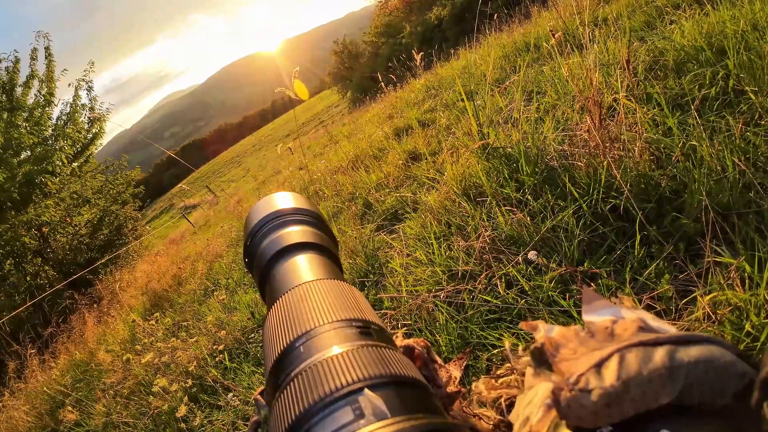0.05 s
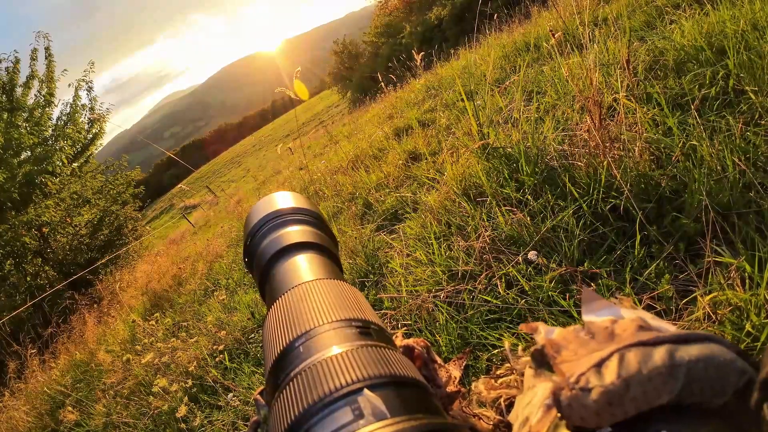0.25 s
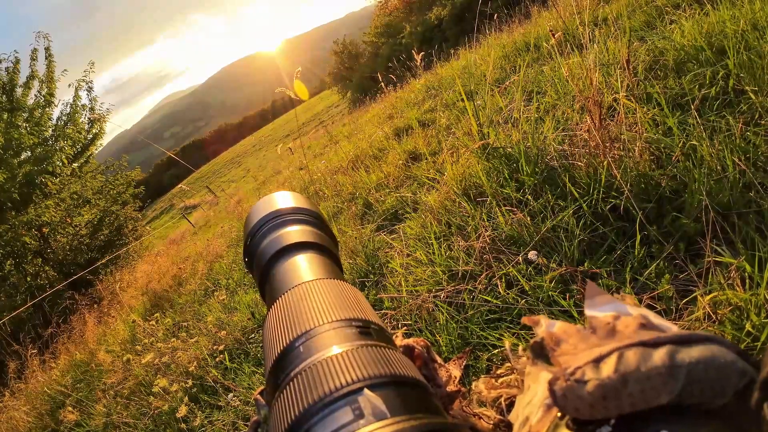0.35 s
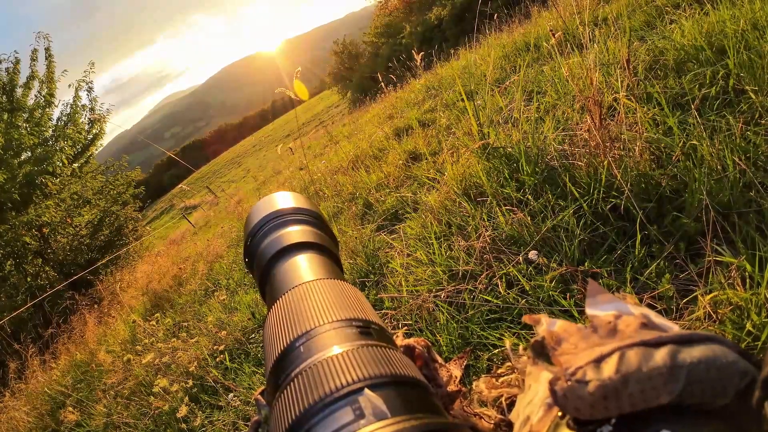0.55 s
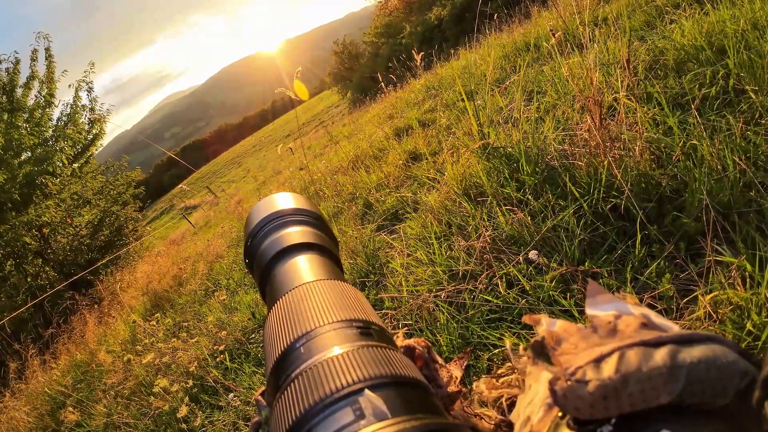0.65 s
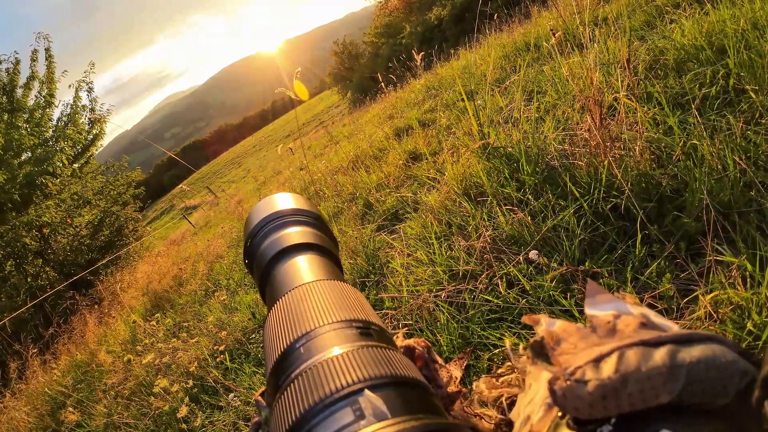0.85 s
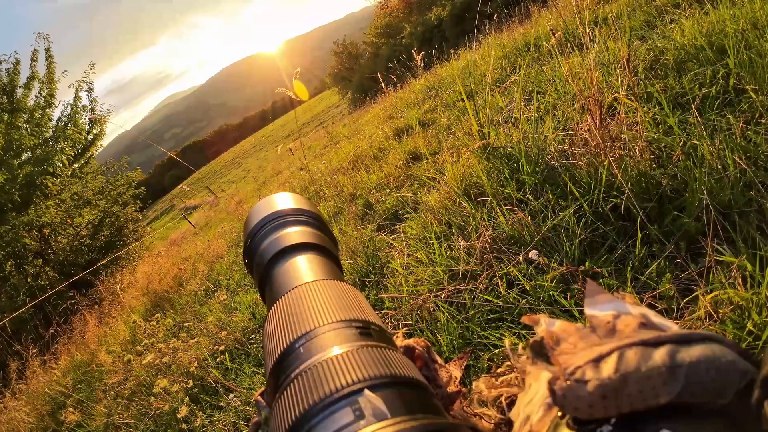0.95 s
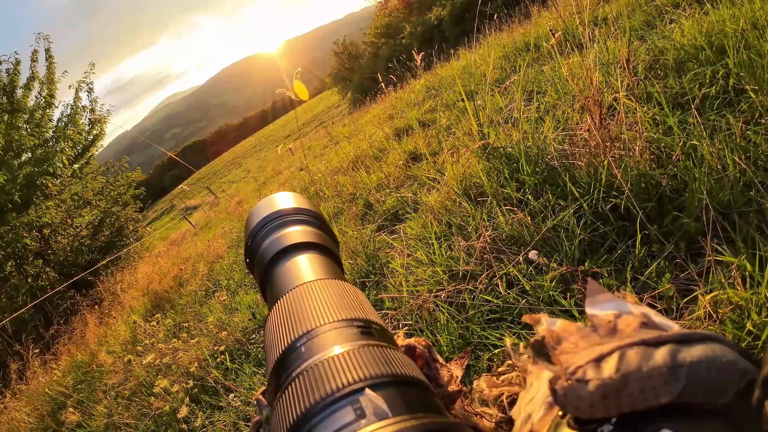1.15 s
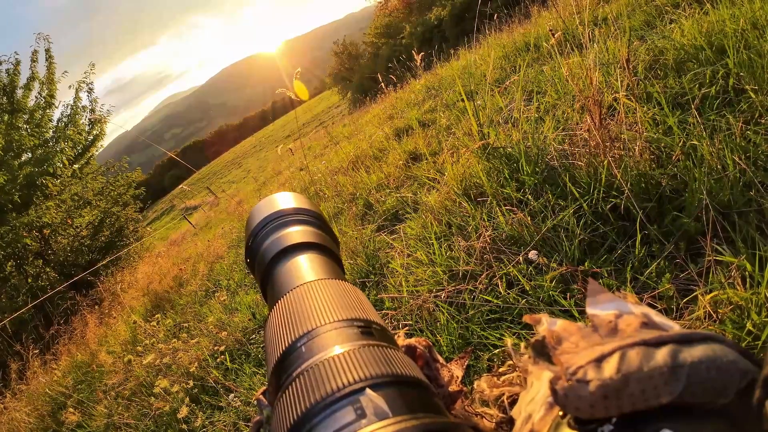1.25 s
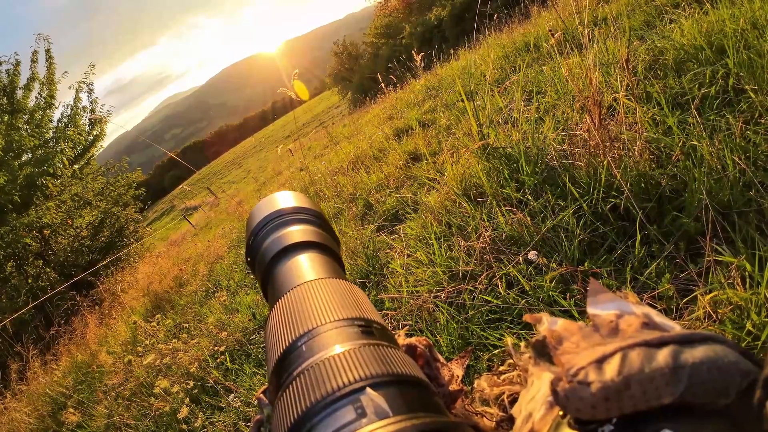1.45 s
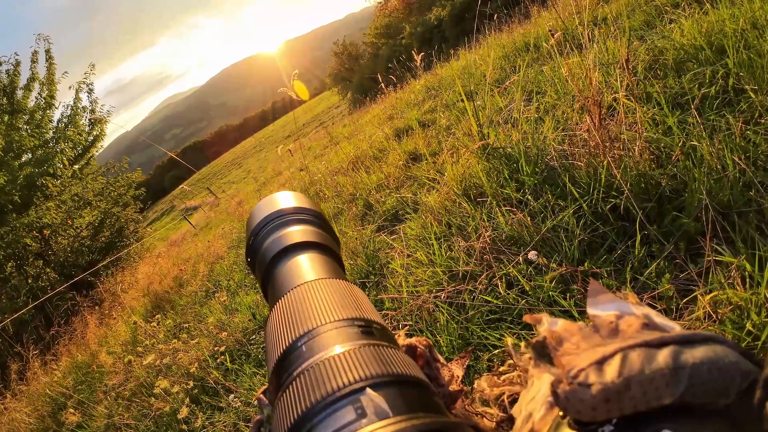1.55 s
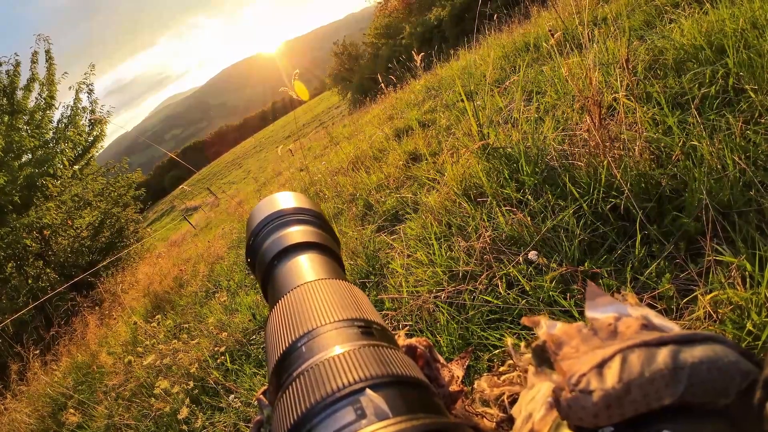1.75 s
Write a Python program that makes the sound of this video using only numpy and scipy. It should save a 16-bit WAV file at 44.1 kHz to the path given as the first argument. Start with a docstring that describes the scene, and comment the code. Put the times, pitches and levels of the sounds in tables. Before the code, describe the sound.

A camera shutter fires once up close, clacking and whirring, over light wind in a quiet meadow

```python
"""In a quiet meadow a reflex camera fires one frame, close to a stereo recorder fixed near it.
Mirror and curtains slap, a motor re-cocks the mechanism with a rattle of latches, and a small actuator in
the lens ticks now and then: every contact is a burst of short decaying sine waves, answered by scattered noise.
Jolts travel through the mount as low decaying tones, and a hand bumps it at the end.
Light wind rumbles on both ports and a hush swells and fades over a faint hiss, all made of shaped noise."""
import sys
import numpy as np
from scipy import signal
from scipy.fft import rfft, irfft, next_fast_len
from scipy.io import wavfile
from scipy.ndimage import map_coordinates

SR = 44100
rng = np.random.default_rng(int(sys.argv[2]) if len(sys.argv) > 2 else 0)


def natural_amplitude(level_db):
    """Convert a level in decibels to a linear amplitude factor, elementwise."""
    exponent = np.asarray(level_db, float) / 20
    return 10 ** exponent


def put_to_file(sound):
    """Save the sound as 16-bit audio at rate SR, in the file named by the first command-line argument."""
    columns = np.atleast_2d(sound).T  # one column per channel
    safe = np.clip(columns, -1, 1)
    whole_steps = np.round(safe * 32767)
    wavfile.write(sys.argv[1], SR, whole_steps.astype(np.int16))


N = 79380


def unit(x):
    """Scaled to rms 1."""
    return x / np.sqrt(np.mean(x ** 2) + 1e-20)


def along(points, hz):
    """Reads a table of (pitch_hz, value) on a log pitch axis."""
    f, v = np.transpose(points)
    return np.interp(np.log(hz + 1), np.log(f + 1), v)


def curve(rows):
    """Turns (time_s, value) rows into one value per sample."""
    return np.interp(np.arange(N) / SR, *np.transpose(rows))


def wobble(rate):
    """A smooth random curve with this many knots a second."""
    knots = rng.standard_normal(int(N * rate / SR) + 4)
    return map_coordinates(knots, [np.arange(N) * rate / SR])


def rush(spectrum, alike):
    """Stereo noise of rms 1: shared (mid) and opposed (side) noise set how alike left and right are."""
    m = next_fast_len(N + 8192)
    hz = np.fft.rfftfreq(m, 1 / SR)
    turn = np.arccos(np.clip(along(alike, hz), -1, 1)) / 2
    shape = natural_amplitude(along(spectrum, hz)) * [np.cos(turn), np.sin(turn)]
    noise = rfft(rng.standard_normal((2, m)))
    mid, side = irfft(noise * shape, m)[:, :N]
    return unit(np.array([mid + side, mid - side]))


# phase between the ports, random from ring to ring: pitch_hz, spread_rad
PORT_SPREAD = [(500, .2), (1500, .25), (3000, .42), (6000, 0.95), (10000, 1.5)]
# average phase by which the left port leads: pitch_hz, lead_rad
PORT_LEAD = [(6500, 0.43), (9500, -1.8), (11500, -2), (14000, -1.4)]


def strike(times, blow_db, modes, loose=1, rise_s=0.00015):
    """Each blow rings all modes as decaying sines, with fresh random level, tuning and phase at the two ports."""
    scatter_db, detune_share, phase_turns = 2, 0.05, 0.35  # random spreads, scaled by loose
    hz, mode_db, t60 = np.transpose(modes)[:, None, :, None]
    t = np.arange(SR // 30) / SR
    chance = rng.standard_normal((len(times), len(modes), 4))
    size, tune, phase, turn = np.moveaxis(chance[..., None], 2, 0)
    start_db = np.reshape(blow_db, (-1, 1, 1)) + mode_db + loose * scatter_db * size
    level = natural_amplitude(start_db - 60 * t / t60)
    level = level * (1 - np.exp(-t / rise_s))
    level = level * (1 - (t / t[-1]) ** 2)  # every ring is gone after a thirtieth of a second
    pitch = hz * (1 + loose * detune_share * tune)
    angle = 2 * np.pi * (pitch * t + loose * phase_turns * phase)
    half = (along(PORT_SPREAD, hz) * turn + along(PORT_LEAD, hz)) / 2
    first = np.round(np.multiply(times, SR)).astype(int)
    where = (first[:, None] + np.arange(len(t))).ravel()
    ports = []
    for side in (1, -1):  # left, right
        rings = (level * np.sin(angle + side * half)).sum(1)
        ports.append(np.bincount(where, rings.ravel(), N + SR)[:N])
    return np.array(ports)


# tone of the background hush: pitch_hz, relative level_db per Hz
HUSH_TONE = [(30, -20.5), (60, 3), (130, -5), (250, -12.5), (420, -12.5), (800, -23), (2600, -29),
             (7000, -120)]
# how loud the hush is over time: time_s, level_db
HUSH_LEVEL = [(0.0, -64.5), (0.33, -56), (1.8, -67)]
# tone of the recorder's hiss: pitch_hz, relative level_db per Hz
HISS_TONE = [(290, -41), (500, -11.5), (690, -4), (1020, -8), (1310, -12), (5500, -16.5), (11000, -26.5),
             (13300, -33), (15500, -29.5), (16500, -34.5)]
# likeness of left and right in both: pitch_hz, likeness (1 = the same)
ALIKE = [(60, 0.17), (150, .55), (300, .5), (700, .5), (2000, 0.17), (8000, .05)]


def hush():
    """The far valley is noise that swells and fades; the recorder's own hiss is steady noise."""
    hiss_db = -72.5
    valley = natural_amplitude(curve(HUSH_LEVEL)) * rush(HUSH_TONE, ALIKE)
    return valley + natural_amplitude(hiss_db) * rush(HISS_TONE, ALIKE)


# how loud the wind is, before the left-right offset: time_s, level_db
WIND_LEVEL = [(0.0, -49.5), (.8, -54.5), (1.202, -57.5), (1.7, -55)]
# tone of the wind: pitch_hz, relative level_db per Hz
RUMBLE_TONE = [(8, -9), (22, 0), (35, -6), (60, -13.5), (120, -28.5), (250, -40), (400, -120)]


def wind():
    """Low noise made lumpy by a random swell of its own on each port."""
    lump_db, pan_db = 2.5, 4.5  # spread of the swells; left is raised and right lowered by pan_db
    lumps = natural_amplitude(lump_db * np.array([wobble(34), wobble(18)]))
    pan = np.array([[pan_db], [-pan_db]])
    rumble = unit(lumps * rush(RUMBLE_TONE, [(30, -0.11)]))
    return natural_amplitude(curve(WIND_LEVEL) + pan) * rumble


# how long the surroundings answer: pitch_hz, time_to_fall_60_db_s
GROUND_FADE = [(300, .08), (2000, 0.16), (10000, 0.084)]


def ground(x):
    """Grass, clothes and hands scatter a short answer: the sound is convolved with fading noise."""
    level_db = -26
    hz, t, noise = signal.stft(rng.standard_normal((2, SR // 4)), SR, nperseg=128)
    fading = noise * natural_amplitude(-60 * t / along(GROUND_FADE, hz)[:, None])
    tail = signal.istft(fading, SR, nperseg=128)[1]
    tail = tail / np.linalg.norm(tail[0])
    return natural_amplitude(level_db) * signal.fftconvolve(x, tail, axes=1)[:, :N]


def thump(s, db, hz, t60, stiff, rise_s):
    """A low decaying sine of the mount; the right port gets it weaker, later in phase and shorter."""
    settle_s = 0.004  # the pitch starts high by the share stiff and settles this fast
    right_db = np.array([[0], [-8]])
    lag_rad = np.array([[0], [2.4]])
    shorter = np.array([[1], [0.55]])  # share of the decay time
    t = np.clip(np.arange(N) / SR - s, 0, None)
    bent_t = t + stiff * settle_s * (1 - np.exp(-t / settle_s))
    level = natural_amplitude(db + right_db - 60 * t / (t60 * shorter)) * (1 - np.exp(-t / rise_s))
    return -level * np.sin(2 * np.pi * hz * bent_t - lag_rad)


# jolts of the mechanism: start_s, low_tone_level_db, high_tone_level_db
JOLTS = [(0.215, -36, -35.5), (0.242, -31.5, -46.5), (0.263, -32, -40), (0.274, -53, -25),
         (0.291, -59, -34), (0.459, -50, -48.5), (0.964, -49, -69)]
# the low and the high tone of the mount: pitch_hz, time_to_fall_60_db_s (on the left)
MOUNT_TONES = [(76, 0.11), (150, 0.086)]
# first touch of the hand, alike on both ports: start_s, level_db, pitch_hz, time_to_fall_60_db_s
TOUCH = (1.7484, -38, 250, .025)
# the hand's bump, left port: start_s, level_db, settled pitch_hz, time_to_fall_60_db_s
BUMP = (1.7497, -22.5, 76, .11)


def mount():
    """Jolts shake two low tones of the mount; then a hand touches it and bumps it, with a falling pitch."""
    shake = np.zeros((2, N))
    for s, *levels in JOLTS:
        for db, (hz, t60) in zip(levels, MOUNT_TONES):
            shake += thump(s, db, hz, t60, stiff=0, rise_s=0.0016)
    touch_s, touch_db, touch_hz, touch_t60 = TOUCH
    t = np.clip(np.arange(N) / SR - touch_s, 0, None)
    touch = natural_amplitude(touch_db - 60 * t / touch_t60) * np.sin(2 * np.pi * touch_hz * t)
    return shake + touch + thump(*BUMP, stiff=1.25, rise_s=0.003)


# moves of the lens actuator: stop_s, stop_level_db, travel_before_stop_s, start_tick_level_db
MOVES = [(0.119, -37.5, .0175, -44.5), (0.1927, -39, .0155, -50.5), (0.9442, -39, .014, -48),
         (0.9743, -38, .013, -51), (1.599, -41.5, 0.0066, -46), (1.764, -41.5, .025, -50.5)]
# ringing of the lens: centre pitch_hz, relative level_db, time_to_fall_60_db_s
LENS_MODES = [(900, -10.5, .009), (1405, -13, 0.0094), (1900, -13.5, .006), (2400, -18, .008),
              (3400, -15.5, .004), (5050, -16, .007), (5900, -19.5, 0.011), (7200, -19.5, 0.0044),
              (9600, -19.5, 0.002), (11300, -16.5, 0.0054)]
# the hollow of the lens barrel, same columns
BARREL = [(685, 2.5, 0.022)]


def lens():
    """Each move is a start tick, a chatter of random taps, a hollow stop and its rebound."""
    taps_per_s, settle_s = 790, 0.009  # the chatter goes on for settle_s after the stop
    chatter_under_db, fade_db_per_s = -8.5, 351.5  # strongest at the stop, fading to both sides
    dull_db_per_octave = -1
    rebound_s, rebound_db, start_hollow_db = 0.003, -4.5, -0.5
    s, db, travel, start_db = np.transpose(MOVES)
    gaps = -np.log(1 - rng.random((len(s), 30)))
    before = np.cumsum(gaps, 1) / taps_per_s - settle_s  # seconds ahead of the stop
    on = before < travel[:, None]
    chatter_s = (s[:, None] - before)[on]
    chatter_db = (db[:, None] + chatter_under_db - fade_db_per_s * np.abs(before))[on]
    tick_s = np.r_[s, s + rebound_s, s - travel]
    ticks = strike(tick_s, np.r_[db, db + rebound_db, start_db], LENS_MODES)
    dull = [(hz, level + dull_db_per_octave * np.log2(hz / LENS_MODES[0][0]), t60)
            for hz, level, t60 in LENS_MODES]
    chatter = strike(chatter_s, chatter_db, dull)
    hollow_db = np.r_[db, start_db + start_hollow_db]
    hollow = strike(np.r_[s, s - travel], hollow_db, BARREL, loose=0.25, rise_s=0.0007)  # slow to build
    return ticks + chatter + hollow


# the cocking motor's course: time_s, base level_db of a tooth tap
MOTOR = [(.3, -74), (.335, -72), (.37, -59), (.395, -52), (.43, -53), (.475, -49.5), (.52, -57),
         (.545, -58), (.588, -64.5), (.6, -99)]
# how strongly a tap rings housing, frame, levers, springs: relative level_db
GEAR_PART_DB = [0, -4, -7.5, -16.5]
# ringing of the gearbox: centre pitch_hz, relative level_db, time_to_fall_60_db_s
GEARBOX = [(2410, -2.5, 0.022)]
# ringing of the camera's four parts, same columns; the shutter strikes them too
HOUSING = [(303, -24, .04), (500, -17, 0.01), (620, -11.5, .012), (883, -7, 0.013), (1038, -5, 0.024),
           (1320, -4.5, .014), (1450, -4.5, .01)]
FRAME = [(1860, -6.5, .01), (2396, -4, 0.023), (2645, -4, 0.014), (3120, -1, .006), (3550, -5.5, 0.014)]
LEVERS = [(4304, -1.5, 0.0073), (4750, 1, .008), (5250, -1.5, .009), (5900, -1, 0.0082),
          (6700, -0.5, 0.0036)]
SPRINGS = [(7900, 3.5, .005), (8770, -0.5, 0.0043), (10244, 3.5, .005), (11580, 1.5, .005),
           (13000, -8, .003), (15200, -9.5, .004)]


def motor():
    """Gear teeth tap the gearbox and the four parts at random moments while the mechanism is cocked."""
    taps_per_s, size_db = 2600, 2.5  # size_db sets the spread of tap sizes
    start, stop = MOTOR[0][0], MOTOR[-1][0]
    draw = rng.random((850, 2))
    s = start + np.cumsum(-np.log(1 - draw[:, 0])) / taps_per_s
    s, luck = s[s < stop], draw[s < stop, 1]
    db = np.interp(s, *np.transpose(MOTOR)) - size_db * (1 + np.log(1 - 0.95 * luck))
    taps = strike(s, db, GEARBOX)
    for over_db, modes in zip(GEAR_PART_DB, (HOUSING, FRAME, LEVERS, SPRINGS)):
        taps += strike(s, db + over_db, modes)
    return taps


# single tones on one pitch, thin parts pinging and, in the last row, a brief whine at the gearbox's pitch:
# start_s, level_db, centre pitch_hz, time_to_fall_60_db_s
PINGS = [(0.2333, -22, 4020, 0.025), (.4062, -21, 3308, 0.0093), (.4552, -15.5, 5250, 0.0076),
         (0.512, -38, 900, 0.12), (0.5785, -43, 1022, 0.02), (.5845, -45, 1010, .015),
         (.9152, -50.5, 5900, 0.01), (0.9155, -54, 2430, 0.016), (.9155, -53, 3516, 0.0113),
         (.28, -53.5, 2400, 0.093)]


def pings():
    """Each row rings once on one pitch: thin parts ping, and a brief whine sounds at the gearbox's pitch."""
    return sum(strike([s], db, [(hz, 0, t60)], loose=0.3) for s, db, hz, t60 in PINGS)


# contacts in the mechanism and how hard they strike each part, before the offsets below:
# start_s, housing_db, frame_db, levers_db, springs_db
CONTACTS = [(0.2205, -38, -33.5, -36.5, -41), (0.222, -19, -5.5, -16.5, -19),
            (0.2234, -28.5, -17.5, -25.5, -26.5), (0.2249, -24, -9.5, -19, -22),
            (0.2249, -31, -7.5, -22.5, -28), (0.2338, -22, -10, -19.5, -25), (0.2344, -36, -26, -21, -28.5),
            (0.2405, -17, -13.5, -26.5, -27), (0.2622, -24, -18.5, -23, -26),
            (0.2651, -20.5, -14.5, -24, -28.5), (0.2666, -17.5, -23, -18.5, -23.5),
            (0.2688, -27, -20, -24, -27.5), (0.271, -27.5, -27, -29.5, -40.5), (0.33, -63.5, -58, -54, -58),
            (0.3403, -66, -42.5, -51.5, -61.5), (0.3764, -41.5, -31.5, -34, -50),
            (0.3787, -27, -35, -46, -52), (0.382, -29, -57.5, -42, -57.5), (0.3819, -61, -25, -44, -46.5),
            (0.387, -36, -34.5, -44, -52.5), (0.406, -45, -27, -36, -27.5), (0.441, -37.5, -45, -46, -43.5),
            (0.441, -51, -27.5, -33.5, -46), (0.4494, -26.5, -19, -24.5, -30.5),
            (0.4498, -43, -28.5, -42, -27), (0.4543, -35, -22, -21, -26), (0.4575, -41, -38, -28, -43),
            (0.4624, -21.5, -24, -35, -29.5), (0.4627, -60, -20.5, -24.5, -32),
            (0.4668, -25, -32, -53.5, -47), (0.4782, -37, -17.5, -23, -33), (0.48, -25.5, -34, -36, -57.5),
            (0.485, -31, -45.5, -37, -45.5), (0.5069, -33, -29, -35, -33.5), (0.509, -41, -26.5, -32, -46),
            (0.513, -32, -57, -50, -56), (0.5304, -26.5, -39, -23.5, -33.5),
            (0.5311, -43, -20, -30.5, -33.5), (0.533, -32.5, -47, -57, -38.5),
            (0.5379, -46, -54.5, -67, -69.5), (0.5733, -62, -37, -59.5, -55),
            (0.5771, -64, -46.5, -40.5, -45), (0.578, -39, -56, -60, -64.5), (0.915, -70, -55, -55.5, -54),
            (1.7435, -56.5, -67, -67.5, -68.5), (1.7533, -46.5, -58, -58, -63.5),
            (1.7912, -59, -56, -64, -61)]
# share of a blow in each ring, for housing, frame, levers, springs: offset_db
PART_DB = [0, -7, -3.5, -3.5]
# first loose after-contact against its blow, for the same four parts: offset_db
RATTLE_DB = [-13, -9, -8.5, -8.5]


def shutter():
    """Mirror, curtains and latches: every contact rings the four parts and rattles on briefly."""
    spacing_s, fades_share = 0.0011, 0.42  # mean gap; each further one loses this share of RATTLE_DB again
    s, *blows = np.transpose(CONTACTS)
    gaps = spacing_s * 2 * rng.random((4, len(s), 5))
    rattle_s = s[:, None] + np.cumsum(gaps, 2)
    fading = 1 + fades_share * np.arange(5)
    sound = np.zeros((2, N))
    for i, modes in enumerate((HOUSING, FRAME, LEVERS, SPRINGS)):
        blow_db = blows[i] + PART_DB[i]
        rattle_db = blow_db[:, None] + RATTLE_DB[i] * fading
        sound += strike(s, blow_db, modes)
        sound += strike(rattle_s[i].ravel(), rattle_db.ravel(), modes)
    return sound


def scene():
    """The camera with its answer from the surroundings, the mount and the air."""
    camera = shutter() + pings() + motor() + lens()
    return camera + ground(camera) + mount() + wind() + hush()


def low_pass(x):
    """Removes everything above the highest recorded frequency."""
    return signal.sosfilt(signal.butter(12, 17110, fs=SR, output="sos"), x)


def record(dry):
    """The recorder takes the finished mix as it is."""
    return low_pass(dry)


dry = scene()
out = record(dry)
put_to_file(out)
```